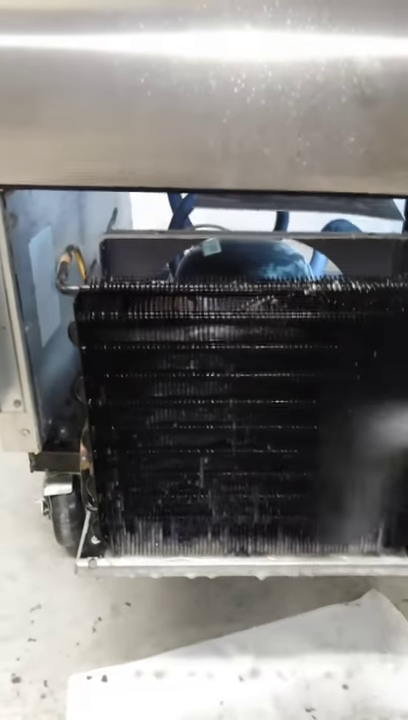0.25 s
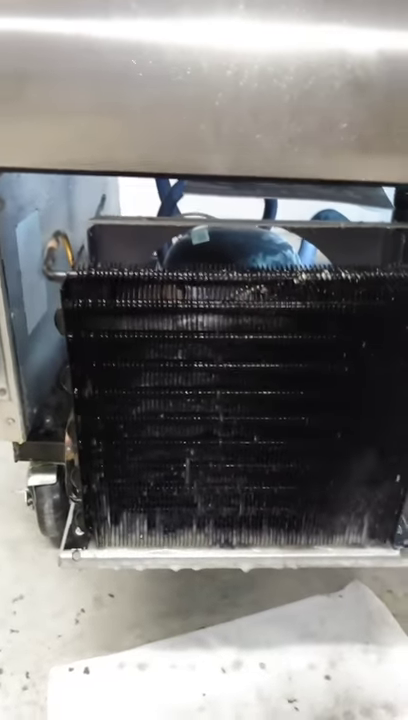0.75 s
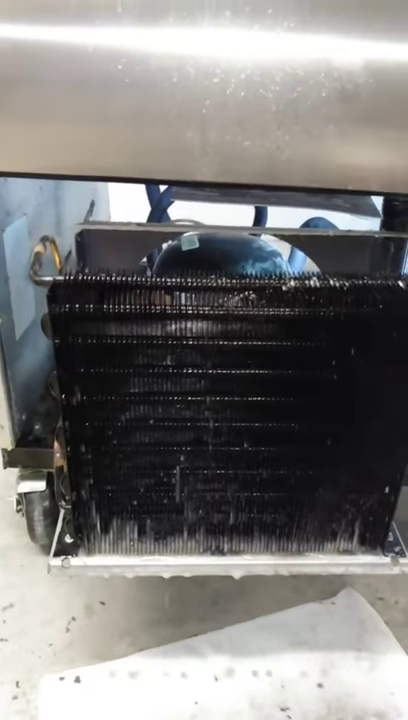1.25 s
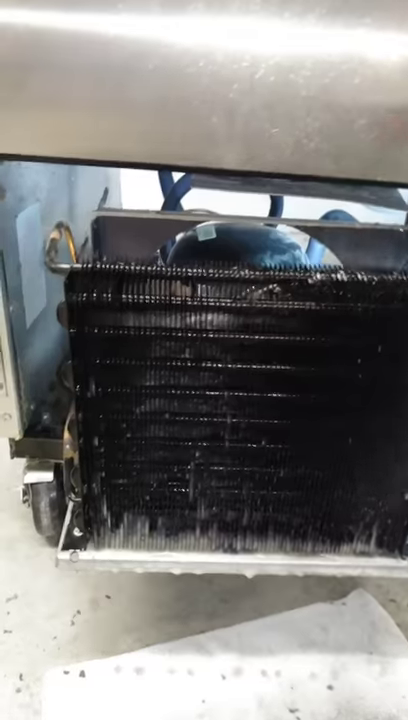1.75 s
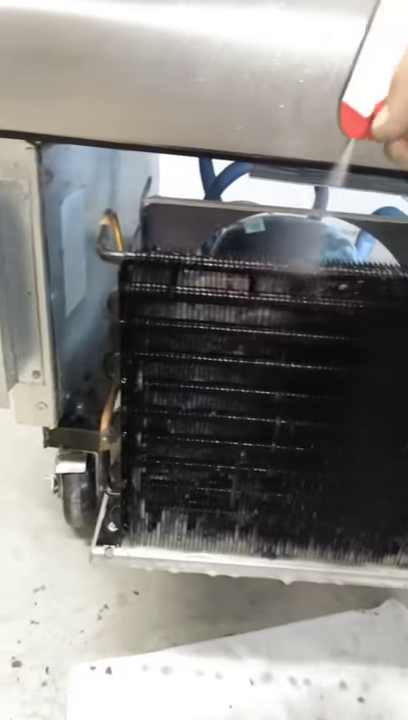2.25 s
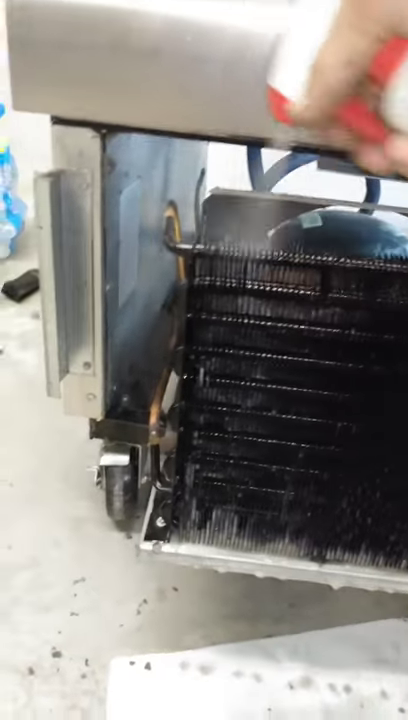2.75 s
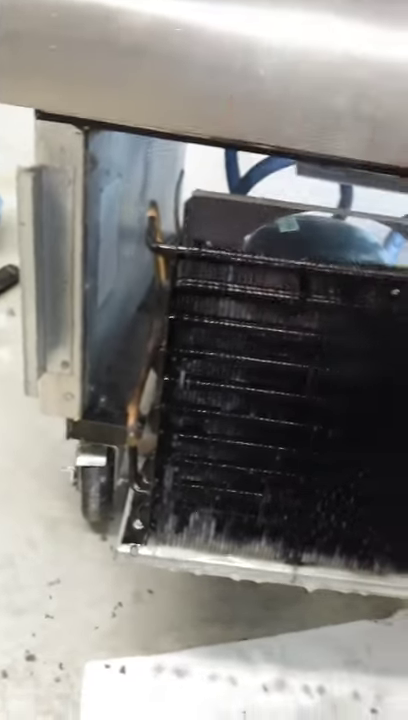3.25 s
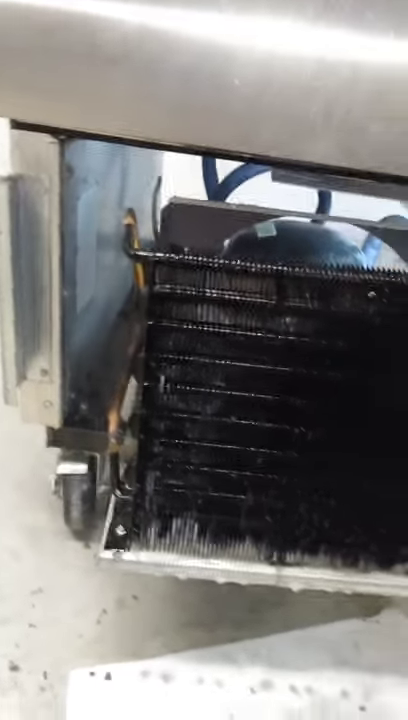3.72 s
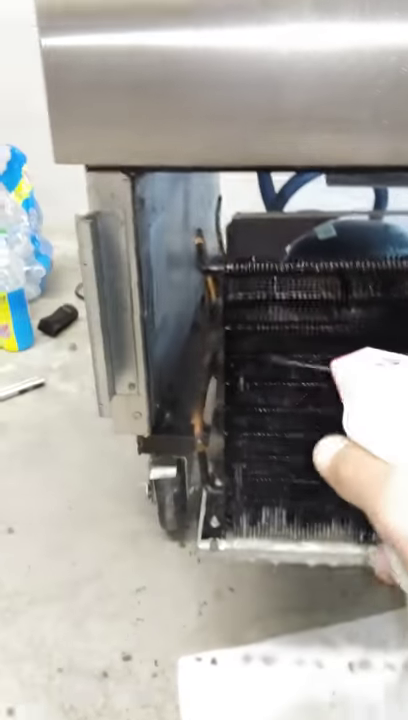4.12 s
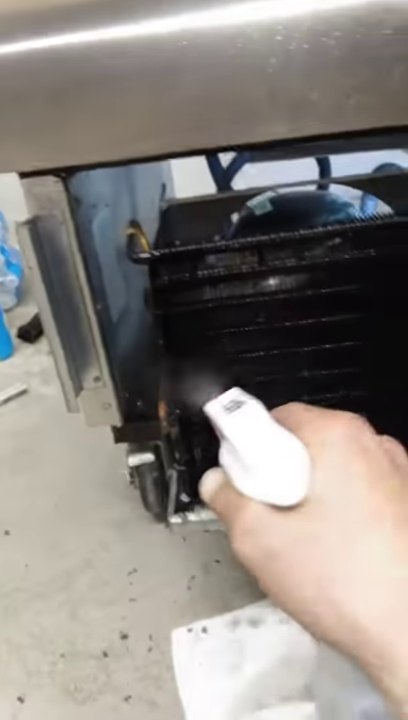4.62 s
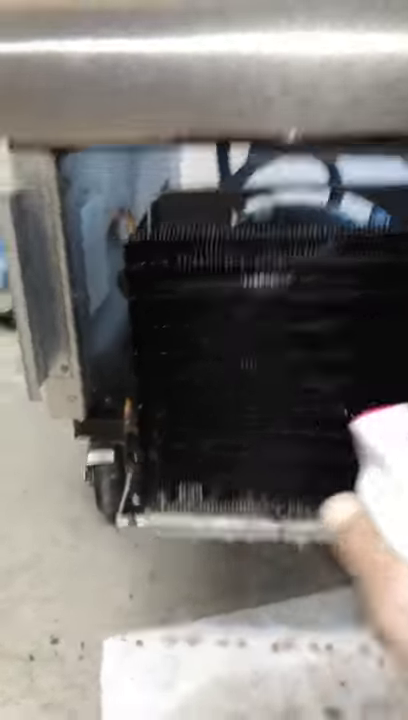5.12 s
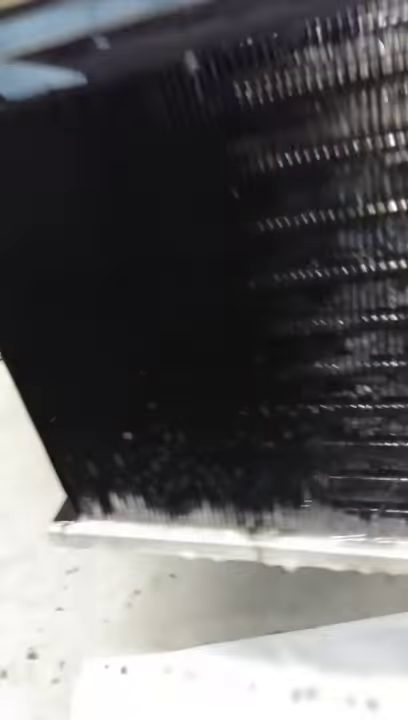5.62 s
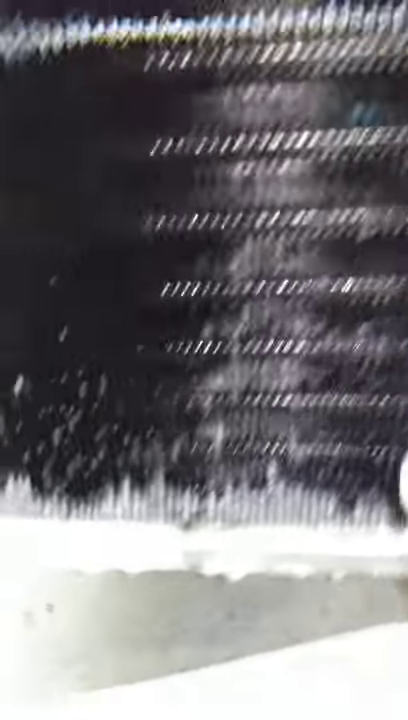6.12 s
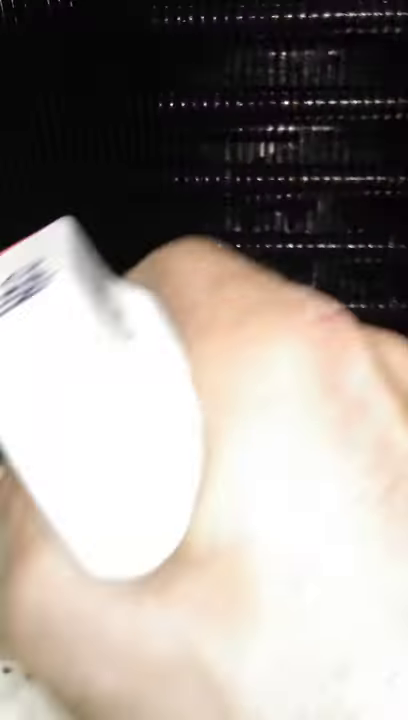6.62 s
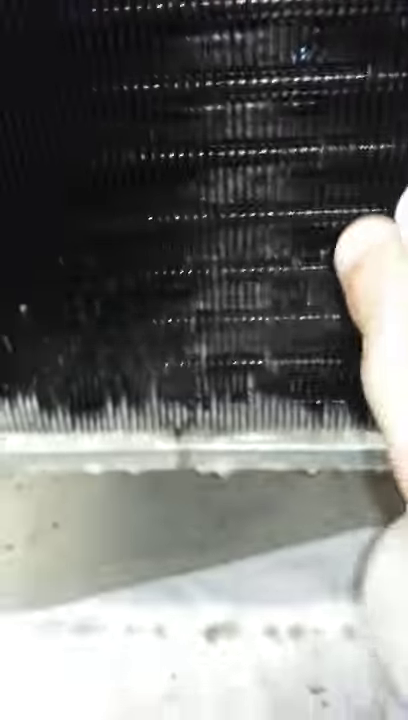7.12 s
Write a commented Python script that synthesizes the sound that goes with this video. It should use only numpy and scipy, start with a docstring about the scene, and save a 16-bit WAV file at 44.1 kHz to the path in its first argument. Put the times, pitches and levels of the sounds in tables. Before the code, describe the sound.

Rhythmic spray-bottle squirts near a metal cabinet, heard in stereo and leaning left, with short tight reflections. Crisp high mist bursts alternate with softer sucking returns, plastic ticks and dry crackling of a sticking piston. From around four seconds dull knocks and creaks of a hand on the device come through, strongest before six; after a brief pause the last three squirts are strong, over faint fan air and hum.

```python
"""Spray bottle at a refrigeration coil

Squeezes of a trigger bottle hiss and spatter as shaped noise, often starting with stick-slip cracks.
The trigger springs back with a shorter, wet hiss; bubbles in the bottle ring as gliding, dying tones.
Bumps and rubs of the hand pass through a camera's case as damped rings and low noise.
Behind them a machine sounds faintly: moving air, wavering hum tones and a thin whine."""
import sys
import numpy as np
from scipy import signal
from scipy.fft import rfft, irfft, next_fast_len
from scipy.io import wavfile
from scipy.ndimage import uniform_filter1d

SR = 44100
rng = np.random.default_rng(int(sys.argv[2]) if len(sys.argv) > 2 else 0)


def unload_wav(signal):
    """Save mono or channel-first audio to the path in sys.argv[1] as 16-bit WAV at rate SR, clipped to [-1, 1]."""
    wavfile.write(
        sys.argv[1],
        SR,
        np.round(np.clip(np.atleast_2d(signal).T, -1, 1) * 32767).astype(np.int16),
    )


N = 325017
TIME = np.arange(N) / SR  # s

# Level columns set relative strengths; an arch is the sag half a stroke's length away from its crest.

# Background over time: t/s, faint hiss level/dB, fan whine level/dB
BACKGROUND_LEVELS = [(0, -49, -68), (1.45, -59.5, -77), (2.7, -59, -73), (5.2, -56, -73), (5.8, -48, -64),
                     (6.05, -68, -67), (6.3, -71.5, -65), (6.6, -60.5, -66.5), (7.37, -66, -68)]
# Machine hum tones: f/Hz, level/dB
HUM_TONES = [(98, -76), (123, -64.5), (245, -84.5), (304, -62.5), (333, -64.5), (630, -74.5)]
# Spectrum of the moving air: f/Hz, level/dB
AIR_SPECTRUM = [(20, -26.5), (50, 1.5), (85, 7), (120, -2.5), (175, 7.5), (340, 9), (480, 4), (630, 4),
                (760, -8.5), (920, 5.5), (1150, -18.5), (2500, -28), (5000, -71.5), (16000, -48)]
# Spectrum of the faint hiss in the room: f/Hz, level/dB
ROOM_HISS_SPECTRUM = [(600, -1.5), (1200, 0), (2100, -3.5), (3500, -4), (6000, -12), (9200, -2),
                      (12000, -10), (16000, -9.5)]
AIR_DB, WHINE_HZ = -60, 917

# Grip creaking on the case, runs of bumps: start t/s, bumps, gap/s, level/dB, mean pitch f/Hz, ring t60/s
CREAK_RUNS = [(4.093, 5, .021, -19.5, 192, 0.034), (4.217, 2, 0.055, -19.5, 226, 0.028),
              (4.4, 1, .02, -19, 348, 0.045), (4.424, 5, .0215, -19.5, 206, 0.052),
              (4.535, 1, .02, -25, 200, .04), (4.706, 5, 0.02, -23.5, 212, 0.26),
              (4.844, 1, .02, -23.5, 195, 0.09), (5.641, 2, 0.01763, -13.5, 387, 0.12),
              (5.722, 1, .02, -19, 246, 0.059), (5.78, 2, 0.021, -14.5, 148, 0.062),
              (5.915, 1, .02, -21.5, 152, 0.077)]
# Finger sliding on the camera: start t/s, length/s, rumble level/dB, scrape level/dB, arch/dB,
# crest as share of the length
RUB_STROKES = [(4.084, .1, -47, -36, 8, 0.3), (4.395, 0.14, -45, -46.5, 0, 0.2),
               (4.689, 0.18, -41, -44, 3.5, 0.24), (5.6, 0.2, -26.5, -24, 4, 0.22),
               (5.82, 0.15, -36, -53, 9, 0.55)]
# Spectrum of the rub's low rumble: f/Hz, level/dB
RUMBLE_SPECTRUM = [(25, -35), (60, 6), (110, 19.5), (200, 17.5), (320, -5), (600, -58)]
# Spectrum of the rub's scrape: f/Hz, level/dB
SCRAPE_SPECTRUM = [(150, -28), (300, -9), (400, -2.5), (520, -10), (750, -19), (1100, -25.5), (2000, -29.5),
                   (4000, -44)]
RUB_ATTACK_S, RUMBLE_FALL_DB_PER_S, SCRAPE_FALL_DB_PER_S = 0.0093, 218, 400
CREAK_ARCH_DB, CREAK_PITCH_SPREAD = 1.5, 0.12  # spread: standard deviation of log pitch
PUSH_S, PUSH_SPREAD = 0.0007, 0.12  # 1/e half-width of the push; standard deviation of its logarithm

# Bubbles in the bottle: t/s, level/dB, initial pitch f/Hz
BUBBLE_POPS = [(0.075, -39, 1610), (1.114, -31, 1940), (1.13, -38, 740), (1.153, -36, 1010),
               (2.355, -42, 457), (3.099, -43, 460), (3.122, -34, 980), (3.342, -35, 1320),
               (3.392, -43, 735), (3.622, -42, 1290), (3.779, -47, 810), (3.817, -28, 814),
               (3.875, -39.5, 1930), (3.938, -36, 1670)]

# Piston sticking and slipping: start t/s, slips, gap/s, crack level/dB, bottle thud level/dB
JUDDER_RUNS = [(0.2019, 1, .01, -22, -39.5), (0.5887, 3, .019, -17.5, -39.5), (0.9525, 1, .01, -26, -47.5),
               (1.9021, 1, .01, -19, -49.5), (1.9164, 3, 0.023, -14, -44.5), (1.9935, 3, .0272, -13, -45),
               (2.237, 4, 0.011, -22, -44), (3.096, 1, .01, -28, -53), (3.4945, 1, .01, -24, -47.5),
               (4.295, 3, .0105, -19, -40), (4.6459, 3, .0123, -18, -39), (4.9807, 6, 0.012, -15, -38),
               (5.3518, 3, 0.012, -17.5, -40.5), (6.7341, 3, 0.0095, -18, -40.5),
               (7.207, 2, 0.0088, -19, -42.5)]
# Snaps of the valve: t/s, level/dB
VALVE_SNAPS = [(0.1835, -19), (0.4224, -22), (0.432, -20.5), (0.5696, -11.5), (0.574, -12.5), (1.23, -34),
               (1.7733, -26), (1.8684, -19), (2.2224, -14.5), (2.5585, -18.5), (3.045, -21), (3.237, -12),
               (3.4462, -16.5), (3.479, -18), (4.2868, -11.5), (4.97, -21), (6.2948, -25), (6.321, -15.5),
               (6.728, -15), (7.1334, -19.5), (7.205, -24)]
# Light ticks of the plastic trigger: t/s, level/dB
TRIGGER_TICKS = [(0.0603, -38), (0.3594, -31), (0.5378, -32), (0.7773, -34), (0.8564, -51), (2.5878, -42.5),
                 (3.358, -34.5), (3.404, -36.5), (3.7784, -34), (4.178, -41.5), (5.5496, -42), (6.562, -43),
                 (6.9673, -42.5)]
# Spectrum of a piston slip: f/Hz, level/dB
SLIP_SPECTRUM = [(300, -28.5), (700, -31), (1200, 6.5), (1650, -41), (2080, 13), (2400, -17.5),
                 (2700, -1.5), (3300, 1), (3900, 6), (4900, -8), (6000, 4), (7200, -12), (9100, 11.5),
                 (11000, -5.5), (16000, -11)]
# Spectrum of a valve snap: f/Hz, level/dB
SNAP_SPECTRUM = [(1000, -15), (3000, -18.5), (6500, -12), (9000, 11), (11000, 1), (16000, -20)]
# Spectrum of a trigger tick, also of a bubble's splash: f/Hz, level/dB
TICK_SPECTRUM = [(400, -25.5), (1000, 6.5), (1500, -8.5), (2050, 7.5), (2700, -5.5), (3900, 0),
                 (6000, -34.5), (12000, -33)]
JUDDER_ARCH_DB = 8  # weakening towards either end of a run
SLIP_JITTER = 0.06  # standard deviation of the timing, as share of the gap

# Trigger springing back: start t/s, length/s, valve hiss level/dB, wet pump fizz level/dB, arch/dB,
# crest as share of the length
RETURN_STROKES = [(0.091, 0.042, -34.5, -50.5, -2.5, 0.43), (0.422, 0.086, -36.5, -48.5, 7.5, 0.59),
                  (0.818, 0.084, -34, -45, 4, 0.24), (1.189, 0.1, -34, -45, 9.5, .52),
                  (1.77, 0.073, -34.5, -48, 8, 0.74), (2.14, 0.027, -29.5, -47.5, -9.5, 0.68),
                  (2.463, 0.076, -31, -48, 2, 0.42), (2.95, .075, -33, -46.5, 4.5, 0.47),
                  (3.313, 0.12, -37, -45.5, 17.5, 0.64), (3.77, 0.083, -38, -42.5, 3.5, 0.39),
                  (4.197, 0.094, -39, -55, 1.5, .75), (4.535, 0.063, -39, -50.5, 2, 0.81),
                  (4.893, 0.076, -39.5, -47, 3, 0.44), (5.237, 0.079, -38, -47, 5, 0.64),
                  (5.594, 0.15, -34, -40, 15.5, 0.53), (5.753, .07, -47.5, -65, 3, 0.56),
                  (6.603, 0.076, -31.5, -42, 4.5, 0.84), (7.02, 0.088, -32.5, -42, 5.5, 0.78)]
# Spectrum of the suction at the valve: f/Hz, level/dB
SUCTION_SPECTRUM = [(4000, -45.5), (6500, -18.5), (7500, -16.5), (8300, -9.5), (9050, -4), (9700, -9),
                    (10600, -14), (12000, -19.5), (13500, -24), (15800, -38)]
# Spectrum of the wet fizz in the pump: f/Hz, level/dB
FIZZ_SPECTRUM = [(300, -33), (900, -2), (1550, -23), (2100, 3), (2800, -1.5), (4100, 8.5), (5100, 2.5),
                 (5800, 4.5), (7500, -37.5), (11000, -7.5)]
RETURN_ATTACK_S, VALVE_FALL_DB_PER_S, FIZZ_FALL_DB_PER_S = 0.019, 340, 221
RETURN_LEFT_DB = -0.5  # left-minus-right shift of the return hiss

# Squeezes of the trigger: start t/s, length/s, nozzle mist level/dB, fin spatter level/dB,
# arch of the effort/dB, crest as share of the length
SQUEEZE_STROKES = [(0, 0.0025, -36.5, -44.5, 3, 0.18), (0.179, 0.17, -31.5, -47, 1, 1),
                   (0.531, 0.181, -32, -46.5, 6.5, 0.59), (0.92, 0.19, -33.5, -48.5, 5, 0.58),
                   (1.553, 0.21, -34.5, -50, 21.5, 0.49), (1.884, 0.22, -33, -43.5, 7.5, 0.37),
                   (2.214, 0.21, -32.5, -46, 10.3, 0.48), (2.703, 0.14, -31.5, -48.5, 5, 0.81),
                   (3.069, 0.2, -30.5, -42, 11.5, 0.6), (3.469, 0.18, -32.5, -45.5, 4, 0.84),
                   (3.907, 0.2, -32, -45, 16, 0.64), (4.267, 0.18, -34, -49.5, 4, 0.71),
                   (4.61, 0.18, -34, -46, 0.1, 0.92), (4.965, 0.15, -31.5, -47.5, 1.5, 0.96),
                   (5.33, 0.179, -30.5, -42.5, 6, 0.72), (6.311, 0.16, -29.5, -43.5, 4.5, 0.73),
                   (6.722, 0.16, -26.5, -41, 4.5, 0.87), (7.194, 0.16, -30, -44.5, 3.2, 0.68)]
# Spectrum of the mist at the nozzle: f/Hz, level/dB
MIST_SPECTRUM = [(3000, -34), (6000, -21.5), (7400, -13), (8300, -5.5), (9100, 0), (9800, -3.5),
                 (10800, -6), (12000, -11.5), (13500, -13), (15800, -19)]
# Spectrum of the spatter on the fins: f/Hz, level/dB
SPATTER_SPECTRUM = [(100, -15), (300, -14.5), (600, -6.5), (1500, -5.5), (2100, -2), (2900, -3.5),
                    (3900, 5.5), (4800, 0), (6200, -2), (8000, -7.5), (12000, -35)]
# Pressure builds at once, and the spatter lingers after the mist
SQUEEZE_ATTACK_S, MIST_FALL_DB_PER_S, SPATTER_FALL_DB_PER_S = 0.0017, 478, 318
DROPS_PER_S, DROP_DB = 140, 15.5

# Where the nozzle points: t/s, left-minus-right level/dB
NOZZLE_PLACE = [(0, 5), (1.65, 5.5), (2.3, 6), (3.9, 5), (4.7, 4.5), (5.7, 2.5), (6.35, 7), (6.85, 5),
                (7.08, 2), (7.3, 7)]
# Phase difference between left and right: f/Hz, phase/rad
PORT_PHASE = [(20, 0.5), (150, 0.16), (300, 0.23), (600, 1.53), (1000, 1.63), (2000, 1.5), (3000, 6),
              (4500, 4.5), (7500, 6.5), (16000, 6.5)]
# Level difference between the ports: f/Hz, left-minus-right level/dB
PORT_SHADE = [(100, -11), (300, -6.5), (700, -6), (1500, -6), (2500, -16), (4000, -4.5), (6000, -3.5),
              (9000, 2.5), (13000, -11.5), (16000, 5)]
# Steel cabinet's reflections against the direct sound: f/Hz, level/dB
CABINET_REFLECTIONS = [(200, -9), (800, 9.5), (2500, 7), (5500, 17.5), (9000, -9.5), (15000, 1.5)]
# Hollow colour of the cabinet: f/Hz, level/dB
HOLLOW_COLOUR = [(1100, -1), (2100, 3), (2700, -2.5), (3600, -5.5), (5500, 0)]
# How much of the hollow colour is heard as the bottle moves: t/s, amount
HOLLOW_AMOUNT = [(3.6, 0.57), (4.2, 1.24), (5.6, 1.4), (6.3, 0.66)]
EDGE_HZ = 15950


def amp(db):
    """Level law: decibels become an amplitude ratio."""
    return 10 ** (np.asarray(db) / 20)


def evened(x):
    """Power normalization: scales a signal to unit rms."""
    return x / np.sqrt(np.mean(x ** 2) + 1e-20)


def read(points, hz):
    """Interpolation on a logarithmic frequency axis."""
    f, value = np.transpose(points)
    return np.interp(np.log(hz + 1), np.log(f + 1), value)


def add(mix, s, sound):
    """Superposition: adds a mono or stereo sound to the mix at time s."""
    part = mix[:, max(round(s * SR), 0):][:, :sound.shape[-1]]
    part += sound[..., :part.shape[1]]


def coloured(x, spectrum):
    """Spectral shaping: filters x by a spectrum, then sets unit rms."""
    size = next_fast_len(len(x) + 2048)
    gain = amp(read(spectrum, np.fft.rfftfreq(size, 1 / SR)))
    return evened(irfft(rfft(x, size) * gain, size)[:len(x)])


def wobble(count, hz):
    """Low-pass random fluctuation, with rates up to about hz."""
    size = next_fast_len(count + SR // 10)
    lowpass = 1 / (1 + (np.fft.rfftfreq(size, 1 / SR) / hz) ** 4)
    return evened(irfft(rfft(rng.standard_normal(size)) * lowpass, size))[:count]


def grainy(count, grain_db, grain_hz, flutter_db=0, flutter_hz=60):
    """Amplitude modulation: fast grain and slower flutter clump white noise."""
    level_db = grain_db * wobble(count, grain_hz) + flutter_db * wobble(count, flutter_hz)
    return rng.standard_normal(count) * amp(level_db)


def burst(spectrum, rise, t60):
    """Transient excitation: coloured noise with exponential decay and peak 1."""
    t = np.arange(SR // 20) / SR
    x = coloured(rng.standard_normal(len(t)), spectrum)
    x = x * (1 - np.exp(-(t / rise) ** 2)) * amp(-60 * t / t60)
    return x / abs(x).max()


def ring(hz, t60, rise, glide=0):
    """Damped oscillation with peak 1; glide is its change of pitch in octaves/s."""
    t = np.arange(SR // 8) / SR
    phase = 2 * np.pi * np.cumsum(hz * 2 ** (glide * t)) / SR
    x = np.sin(phase) * (1 - np.exp(-t / rise)) * amp(-60 * t / t60)
    return x / abs(x).max()


def stroke(length, arch_db, crest, attack, fall_db_per_s):
    """Effort envelope: sets in, follows a parabolic arch in dB, and decays after the stroke."""
    t = np.arange(SR // 2) / SR
    sag_db = arch_db * (2 * (np.minimum(t / length, 1) - crest)) ** 2
    fall_db = fall_db_per_s * np.maximum(t - length, 0)
    return (1 - np.exp(-(t / attack) ** 2)) * amp(-sag_db - fall_db)


def stick_slip(start, count, gap, arch_db):
    """Stick-slip friction: a run of uneven slips, strongest in the middle, as rows (t/s, level/dB)."""
    k = np.arange(count)
    late = rng.standard_normal(count) * (k > 0)
    times = start + gap * (k + SLIP_JITTER * late)
    return zip(times, -arch_db * ((2 * k + 1) / count - 1) ** 2)


def pan_gains(s, left_db, shade_db=0):
    """Level difference between ports: left and right gains at time s."""
    left_minus_right_db = np.interp(s, *np.transpose(NOZZLE_PLACE)) + left_db + shade_db
    return amp(np.array([[0.5], [-0.5]]) * left_minus_right_db)


def from_bottle(s, x, scatter_t60=0.18, scatter_db=0, left_db=0):
    """Direct and scattered propagation to two ports, with fresh cabinet reflections on every call."""
    size, margin = 4096, 64  # samples; the margin holds the part of the response ahead of time zero
    t, hz = np.arange(size) / SR, np.fft.rfftfreq(size, 1 / SR)
    scatter = rng.standard_normal((2, size)) * amp(-60 * t / scatter_t60)
    scatter = rfft(scatter / np.linalg.norm(scatter, axis=1, keepdims=True))
    direct = np.array([np.ones(len(hz)), np.exp(-1j * read(PORT_PHASE, hz))])
    wet = amp(read(CABINET_REFLECTIONS, hz) + scatter_db)
    sides = pan_gains(s, left_db, read(PORT_SHADE, hz))
    # Divide by the expected mid-channel magnitude
    direct_power = abs((sides * direct).mean(0)) ** 2
    scatter_power = wet ** 2 * (sides ** 2).mean(0) / 2
    centre = np.sqrt(direct_power + scatter_power)
    path = np.roll(irfft(sides * (direct + wet * scatter) / centre), margin, axis=1)
    return signal.fftconvolve(x[None], path, axes=1)[:, margin:]


def spitting(count, grain_db, grain_hz, flutter_db):
    """Shot noise: sparse coarse droplets over fine grainy noise."""
    drops = (rng.random(count) < DROPS_PER_S / SR) * rng.uniform(-0.9, 1, count)
    fine = evened(grainy(count, grain_db, grain_hz, flutter_db, flutter_hz=74))
    return fine + 2 * amp(DROP_DB) * drops


def hiss(s, level, spectrum, grain_db, grain_hz, flutter_db, cloud_db, left_db=0):
    """Turbulent jet noise: a shared source plus a wide droplet cloud, independent at each port."""
    # No two strokes leave the same liquid in the nozzle, so its resonance moves a little
    spectrum = np.array(spectrum) * [1 + 0.02 * rng.standard_normal(), 1]
    near, left, right = (
        level * coloured(spitting(len(level), grain_db, grain_hz, flutter_db), spectrum) for _ in range(3))
    out = from_bottle(s, near, scatter_t60=0.037, left_db=left_db)
    add(out, 0, amp(cloud_db) * pan_gains(s, left_db) * np.array([left, right]))
    return out


def shifting(x, depth_db):
    """Time-varying interference: spectral peaks and dips drift as the nozzle sweeps over the fins."""
    z = signal.stft(x, nperseg=256)[2]
    patches = rng.standard_normal(z.shape)
    for _ in range(2):
        patches = uniform_filter1d(patches, size=3, axis=1)  # across frequency
        patches = uniform_filter1d(patches, size=24, axis=2)  # across time
    # The mean gives both ports a shared part of the drift
    gain = evened(amp(depth_db * evened(patches + patches.mean(0))))
    return signal.istft(z * gain, nperseg=256)[1][:, :N]


def aimed(x):
    """Reflection colouring: the sound turns hollower while the bottle faces the coil head on."""
    hz, t, z = signal.stft(x, SR, nperseg=256)
    amount = np.interp(t, *np.transpose(HOLLOW_AMOUNT))
    gain = amp(read(HOLLOW_COLOUR, hz)[:, None] * amount)
    return signal.istft(z * gain, nperseg=256)[1][:, :N]


def room(x, t60):
    """Diffuse reverberation: convolution with exponentially decaying noise."""
    t = np.arange(SR // 2) / SR
    tail = rng.standard_normal((2, len(t))) * amp(-60 * t / t60) * (1 - np.exp(-t / 0.0014))
    return signal.fftconvolve(x, tail / np.linalg.norm(tail[0]), axes=1)[:, :N]


def machine():
    """Flow noise and tonal hum: partly coherent air noise with phase-modulated sine tones."""
    s, *levels = np.transpose(BACKGROUND_LEVELS)
    hiss_gain, whine_gain = (amp(np.interp(TIME, s, db)) for db in levels)
    shared, left, right = (coloured(rng.standard_normal(N), AIR_SPECTRUM) for _ in range(3))
    air = amp(AIR_DB) * (0.91 * shared + 0.66 * np.array([left, right]))
    room_noise = np.array([coloured(rng.standard_normal(N), ROOM_HISS_SPECTRUM) for _ in range(2)])
    hum = np.zeros(N)
    for hz, db in HUM_TONES:
        phase = 2 * np.pi * hz * TIME + 2.0 * wobble(N, hz=8.6)
        hum += amp(db) * np.sqrt(2) * np.sin(phase)
    whine_phase = 2 * np.pi * WHINE_HZ * TIME + 1.3 * wobble(N, hz=16)
    whine = whine_gain * np.sqrt(2) * np.sin(whine_phase)
    # Air and hum rise and sink with the hiss, but less
    background_gain = (hiss_gain / np.median(hiss_gain)) ** 0.17
    return background_gain * (air + hum) + hiss_gain * room_noise + whine


def creaks():
    """Impulse response of the case: soft pushes and damped rings through a band-pass."""
    out = np.zeros((2, N))
    case = signal.butter(2, [105, 800], "bandpass", fs=SR, output="sos")
    for start, count, gap, peak_db, hz, t60 in CREAK_RUNS:
        for s, db in stick_slip(start, count, gap, CREAK_ARCH_DB):
            pitch = hz * np.exp(CREAK_PITCH_SPREAD * rng.standard_normal())
            body = ring(pitch, t60=t60, rise=0.0022)
            t = np.arange(len(body)) / SR
            width = PUSH_S * np.exp(PUSH_SPREAD * rng.standard_normal())
            push = np.exp(-(t / width - 3) ** 2)
            bump = signal.sosfilt(case, push + 0.5 * body)
            add(out, s, amp(peak_db + db - 7.0) * bump / abs(bump).max())
    return out


def rubs():
    """Sliding friction: low rumble and higher scrape share one motion."""
    out = np.zeros((2, N))
    for s, length, rumble_db, scrape_db, arch_db, crest in RUB_STROKES:
        rumble = amp(rumble_db - 6) * stroke(length, arch_db, crest, RUB_ATTACK_S, RUMBLE_FALL_DB_PER_S)
        scrape = amp(scrape_db - 9.5) * stroke(length, arch_db, crest, RUB_ATTACK_S, SCRAPE_FALL_DB_PER_S)
        rumble_noise = grainy(len(rumble), grain_db=3.5, grain_hz=89.5)
        scrape_noise = grainy(len(scrape), grain_db=1.0, grain_hz=150)
        add(out, s, rumble * coloured(rumble_noise, RUMBLE_SPECTRUM))
        add(out, s, scrape * coloured(scrape_noise, SCRAPE_SPECTRUM))
    return out


def handling():
    """Structure-borne sound: both ports get one waveform, a little stronger at the right."""
    return (creaks() + rubs()) * amp([[-1.2], [1.2]])


def slosh():
    """Bubble resonance: a brief tone rising in pitch, with a small splash."""
    out = np.zeros((2, N))
    for s, db, hz in BUBBLE_POPS:
        bubble = amp(db + 1) * ring(hz, t60=0.02, rise=0.0008, glide=2.5)
        splash = amp(db - 3) * burst(TICK_SPECTRUM, rise=0.0009, t60=0.018)
        add(out, s, from_bottle(s, bubble, scatter_t60=0.03, scatter_db=-6))
        add(out, s, from_bottle(s, splash, scatter_t60=0.085))
    return out


def judders():
    """Stick-slip excitation: each slip of the piston cracks and shakes the bottle."""
    out = np.zeros((2, N))
    for start, count, gap, crack_db, thud_db in JUDDER_RUNS:
        for s, db in stick_slip(start, count, gap, JUDDER_ARCH_DB):
            low = ring(hz=250 * rng.uniform(0.767, 1.314), t60=0.041, rise=0.007)
            high = ring(hz=400 * rng.uniform(0.797, 1.176), t60=0.074, rise=0.00097)
            thud = amp(thud_db + db + 7.5) * (low + 0.56 * high)
            slip = amp(crack_db + db - 3) * burst(SLIP_SPECTRUM, rise=0.0007, t60=0.028)
            # Each slip spits a gush of droplets
            gush = amp(thud_db + db + 10.5) * burst(SPATTER_SPECTRUM, rise=0.0051, t60=0.069)
            # The piston catches again with a sharp crack
            catch = amp(crack_db + db + 1) * burst(SLIP_SPECTRUM, rise=0.0001, t60=0.004)
            add(out, s, from_bottle(s, thud))
            add(out, s, from_bottle(s, slip, scatter_t60=0.035))
            add(out, s, from_bottle(s, gush, scatter_t60=0.077))
            add(out, s + 0.0015, from_bottle(s, catch, scatter_t60=0.012, scatter_db=-4))
    return out


def clicks():
    """Impact noise: the valve snaps and the plastic trigger ticks as short bursts."""
    out = np.zeros((2, N))
    for s, db in VALVE_SNAPS:
        snap = amp(db - 3.5) * burst(SNAP_SPECTRUM, rise=0.00076, t60=0.0072)
        add(out, s, from_bottle(s, snap, scatter_t60=0.015))
    for s, db in TRIGGER_TICKS:
        tick = amp(db + 2.5) * burst(TICK_SPECTRUM, rise=0.0005, t60=0.016)
        add(out, s, from_bottle(s, tick, scatter_t60=0.11))
    return out


def returns():
    """Suction flow noise: the trigger springs back and the pump draws wetly."""
    out = np.zeros((2, N))
    for s, length, valve_db, fizz_db, arch_db, crest in RETURN_STROKES:
        valve = amp(valve_db) * stroke(length, arch_db, crest, RETURN_ATTACK_S, VALVE_FALL_DB_PER_S)
        fizz = amp(fizz_db) * stroke(length, arch_db, crest, RETURN_ATTACK_S, FIZZ_FALL_DB_PER_S)
        middle = s + length / 2
        add(out, s, hiss(middle, valve, SUCTION_SPECTRUM, grain_db=2.0, grain_hz=700,
                         flutter_db=2.0, cloud_db=-2, left_db=RETURN_LEFT_DB))
        add(out, s, hiss(middle, fizz, FIZZ_SPECTRUM, grain_db=3.5, grain_hz=800,
                         flutter_db=2.5, cloud_db=-3, left_db=RETURN_LEFT_DB))
    return out


def squirts():
    """Jet break-up and droplet impact: the nozzle hisses with mist and the fins patter."""
    out = np.zeros((2, N))
    for s, length, mist_db, spatter_db, arch_db, crest in SQUEEZE_STROKES:
        mist = amp(mist_db) * stroke(length, arch_db, crest, SQUEEZE_ATTACK_S, MIST_FALL_DB_PER_S)
        spatter = amp(spatter_db) * stroke(length, arch_db, crest, SQUEEZE_ATTACK_S, SPATTER_FALL_DB_PER_S)
        middle = s + length / 2
        add(out, s, hiss(middle, mist, MIST_SPECTRUM, grain_db=-1.0, grain_hz=897,
                         flutter_db=1.2, cloud_db=-10))
        add(out, s, hiss(middle, spatter, SPATTER_SPECTRUM, grain_db=6.5, grain_hz=1177,
                         flutter_db=0.0, cloud_db=-1.5))
    return out


def scene():
    """Superposition of machine, handling, bottle and the bottle's reverberation."""
    background = machine() + handling()
    spray = shifting(squirts() + returns(), depth_db=2.9)
    bottle = aimed(spray + judders() + clicks()) + slosh()
    echo = amp(-18) * room(bottle, t60=0.3)
    return background + bottle + echo


def record(dry):
    """Band limitation: a linear-phase low-pass removes the highest frequencies."""
    lowpass = signal.firwin(511, EDGE_HZ, window=("kaiser", 9), fs=SR)
    return signal.oaconvolve(dry, lowpass[None], "same")


dry = scene()
out = record(dry)
unload_wav(out)
```